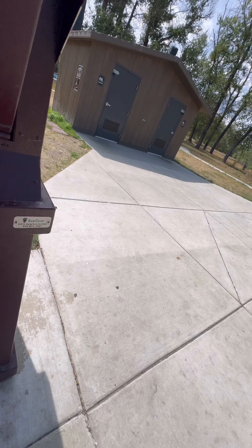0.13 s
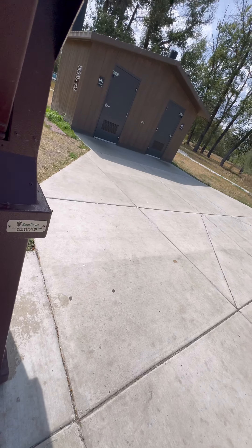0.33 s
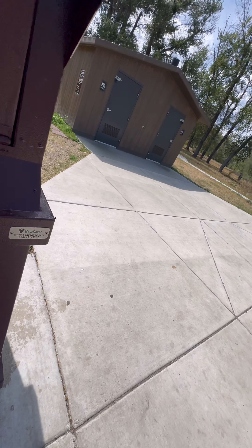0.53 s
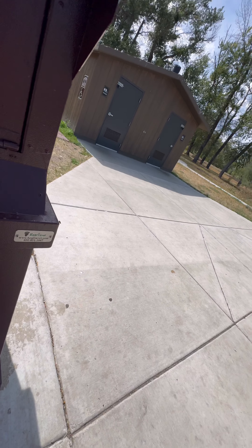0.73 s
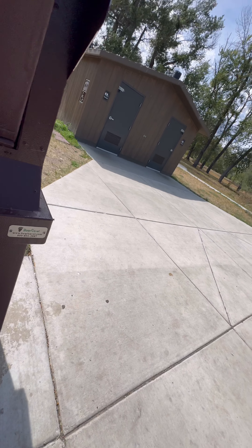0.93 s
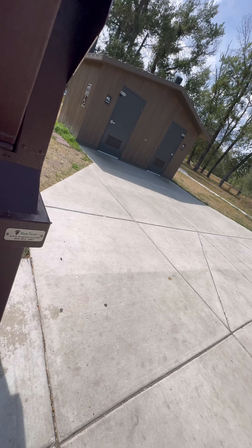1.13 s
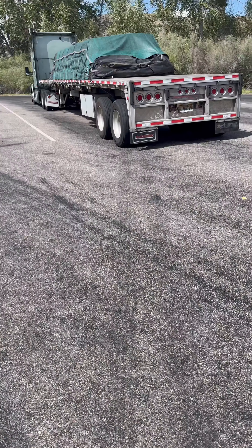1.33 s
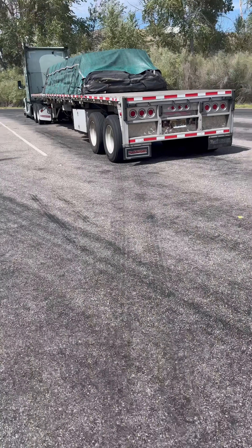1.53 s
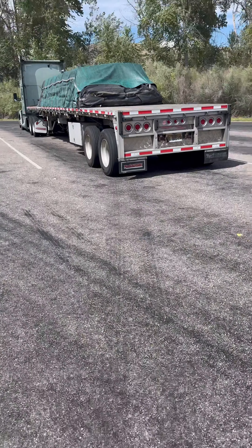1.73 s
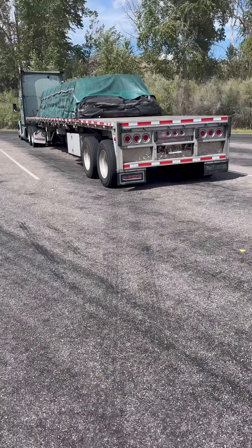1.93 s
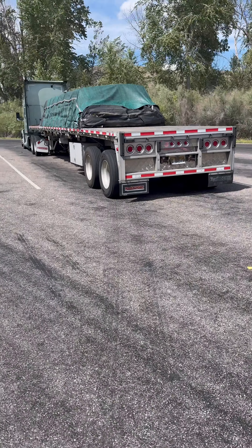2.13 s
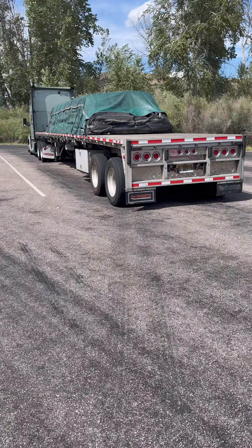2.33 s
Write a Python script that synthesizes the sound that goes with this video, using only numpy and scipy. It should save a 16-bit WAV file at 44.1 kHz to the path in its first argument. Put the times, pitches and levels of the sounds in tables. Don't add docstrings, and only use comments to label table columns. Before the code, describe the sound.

A steel bin lid slams shut with a loud, hollow bang, then a diesel truck idles close by

```python
import sys
import numpy as np
from scipy import signal
from scipy.fft import rfft, irfft, next_fast_len
from scipy.io import wavfile
from scipy.ndimage import uniform_filter1d, map_coordinates

SR = 44100
rng = np.random.default_rng(int(sys.argv[2]) if len(sys.argv) > 2 else 0)


def file_out(sig):
    cols = np.atleast_2d(sig).T
    lim = np.clip(cols, -1, 1)
    pcm = np.round(lim * 32767).astype(np.int16)
    wavfile.write(sys.argv[1], SR, pcm)


def ratio(d):
    e = np.asarray(d, float) / 20
    return 10 ** e


N = 105663
T = np.arange(N) / SR


def unit(x):
    return x / np.sqrt(np.mean(x ** 2) + 1e-20)


def along(points, hz):
    f, v = np.transpose(points)
    return np.interp(np.log(hz + 1), np.log(f + 1), v)


def wobble(rate):
    return map_coordinates(rng.standard_normal(300), [np.clip(T * rate, 0, 290)])


def filtered(x, response):
    m = next_fast_len(N + SR // 2)
    return irfft(rfft(x, m) * response(np.fft.rfftfreq(m, 1 / SR)), m)[..., :N]


def ports(pair, lead, pan):
    side = np.array([[.5], [-.5]])
    return filtered(pair, lambda hz: ratio(side * along(pan, hz)) * np.exp(1j * side * along(lead, hz)))


def rush(spectrum, alike, source=None):
    pair = rng.standard_normal((2, N))
    if source is not None:
        pair = pair * source

    def response(hz):
        turn = np.arccos(np.clip(along(alike, hz), 0, 1)) / 2
        return ratio(along(spectrum, hz)) * [np.cos(turn), np.sin(turn)]

    mid, side = filtered(pair, response)
    return unit(np.array([mid + side, mid - side]))


def ring(s, db, hz, t60, attack=0.0035, turn=0):
    out = np.zeros(N)
    span = slice(int(s * SR) + 1, int((s + 1.5 * t60) * SR))
    t = T[span] - s
    tone = np.sin(2 * np.pi * (hz * t + np.broadcast_to(turn, N)[span]))
    out[span] = ratio(db - 60 * t / t60) * tone * (1 - np.exp(-t / attack))
    return out


def dying(t60, seconds, channels):
    hz, t, z = signal.stft(rng.standard_normal((channels, int(seconds * SR))), SR, nperseg=128)
    return signal.istft(z * ratio(-60 * t / along(t60, hz)[:, None]), SR, nperseg=128)[1]


def shaft():
    idle_hz, wander = 19.42, 0.00447
    return np.cumsum(idle_hz * (1 + wander * wobble(2.88))) / SR


# (shaft order, level [dB])
EXHAUST = [(2, -58.5), (3, -37.5), (4, -41.5), (5, -28.5), (6, -49.5), (7, -30), (8, -31.5), (9.5, -41),
           (11, -51), (12, -42), (14, -47.5), (16, -51), (21.5, -47), (24.5, -53.5)]
# (time [s], level [dB])
SURGE = [
    (1.2, -0.5),
    (1.33, -11),
    (1.39, 5.5),
    (1.52, -1),
    (1.62, -1),
    (1.95, -6.5),
    (2.12, 2),
    (2.25, -3),
    (2.4, 3),
]


def exhaust(turns):
    lope_db, lope_rate = 2.5, 7.215
    load_db = np.interp(T, *np.transpose(SURGE))
    tones = np.zeros(N)
    for order, db in EXHAUST:
        share = np.where(order <= 5, 1, (order <= 8) * 0.26)
        level = ratio(db + share * load_db + lope_db * wobble(lope_rate))
        tones += level * np.sin(2 * np.pi * (order * turns + rng.random()))
    return tones * 2 ** .5


# (frequency [Hz], level [dB per Hz])
FAR_AIR = [(30, -11.5), (100, -4.5), (244, -15), (330, -23.5), (1030, -22.5), (1400, -32), (4700, -40),
           (9000, -58), (15800, -72.5)]
# (frequency [Hz], coherence [0 to 1])
FAR_ALIKE = [(60, 0.81), (240, 0.87), (950, 0.28), (3770, 0.15), (15000, .05)]
# (frequency [Hz], phase [rad])
FAR_LEAD = [(300, 0.13), (1300, 0.14), (4000, 1.1)]
# (frequency [Hz], level [dB])
FAR_PAN = [(60, -3.8), (380, -2.5), (2380, -0.3), (15000, 0)]


def far_truck(tones):
    air = ratio(-36 + 0.4 * wobble(11.5)) * rush(FAR_AIR, FAR_ALIKE)
    return ports(ratio(-14.5) * tones + air, FAR_LEAD, FAR_PAN)


# (time [s], level [dB], rise [s], t60 [s])
SCUFFS = [(0.02, -42.5, 0.063, 0.6), (0.095, -42.5, 0.014, 0.45), (0.1429, -34, 0.00089, 0.055),
          (0.31, -46, 0.0092, 0.044), (0.409, -43, 0.037, 1.17), (0.5282, -37, .0007, 0.086),
          (0.612, -32.5, 0.034, 0.39), (0.82, -41.5, .001, 0.13), (0.902, -40.5, 0.072, 0.86),
          (0.965, -33.5, 0.0094, 0.29), (1.028, -40.5, 0.08, 0.091), (1.117, -43, .004, 0.076),
          (1.178, -40.5, 0.036, 0.95)]
# (frequency [Hz], level [dB per Hz])
GRIT = [(590, -0.5), (1000, -8), (1500, -15), (3250, -10.5), (6000, -13.5), (9000, -16.5), (12000, -28),
        (15800, -21)]


def scuffs():
    grains_per_s, grain_db = 800, -9
    swell = np.zeros(N)
    for s, db, rise, t60 in SCUFFS:
        decay = ratio(db - 60 * np.clip(T - s, 0, None) / t60)
        swell += decay * np.exp(np.clip(T - s, None, 0) / rise)
    grains = (rng.random(N) < grains_per_s / SR) * rng.exponential(1, N) * 20
    rough = 1 + ratio(grain_db) * uniform_filter1d(grains, size=20)
    return swell * rush(GRIT, [(1000, 0.92)], rough)


# (time [s], level [dB], frequency [Hz])
TICKS = [(0.0923, -30.5, 6150), (.1416, -34, 7750), (.3012, -42, 4870), (.5287, -34.5, 1950),
         (.529, -29.5, 5200), (0.532, -30.5, 2940), (0.536, -28.5, 8100), (0.594, -44, 2680),
         (.745, -30, 5700), (.8175, -30, 5400), (.836, -35, 4700), (.947, -38, 11200), (.9617, -28, 3370),
         (1.116, -31.5, 5500), (1.177, -33, 3200)]


def ticks():
    spread = rng.normal(1, 0.074, (len(TICKS), 4))
    out = np.zeros(N)
    for (s, db, hz), ratios in zip(TICKS, spread):
        out += sum(ring(s, db - 9, hz * k, t60=.035, attack=0.00084) for k in ratios)
    return out


# (time [s], peak [dB], frequency [Hz], t60 [s])
HEELS = [
    (.144, -16, 255, 0.04),
    (.145, -26, 332, 0.042),
    (.19, -27.5, 198, 0.063),
    (0.533, -30, 152, 0.029),
]


def heels():
    out = np.zeros(N)
    for s, db, hz, t60 in HEELS:
        out += ring(s, db, hz, t60) + 0.41 * ring(s, db, hz * 1.745, t60 * 0.97)
    return out


# (time [s], peak [dB], brightness [dB])
CONTACTS = [
    (0.6214, -12, 6.5),
    (0.634, -13, 4.5),
    (.65, -16.5, 7.5),
    (0.6576, -19.5, -7.5),
    (.672, -23, -6.5),
    (0.695, -24.5, -3),
    (0.714, -31.5, -5),
]
# (frequency [Hz], level [dB per Hz])
CRASH = [(40, -30.5), (100, -7.5), (300, -6.5), (700, -6), (1470, -15), (6500, -15), (10000, -19),
         (15800, -34.5)]
# (frequency [Hz], t60 [s])
DYING = [(60, 1.0), (200, .55), (400, 1.0), (700, 0.58), (1200, 0.64), (3000, 0.23), (8000, 0.15),
         (15000, 0.077)]


def rim_crash():
    out = np.zeros(N + SR)
    for s, db, bright_db in CONTACTS:
        crash = dying(DYING, .8, channels=1)[0] * ratio(-3.5)
        crash[:300] += 1.17 * ratio(bright_db - 60 * T[:300] / 0.022) * rng.standard_normal(300)
        crash[:300] *= 1 - np.exp(-T[:300] / 0.00064)
        out[round(s * SR):][:len(crash)] += ratio(db - CONTACTS[0][1]) * crash
    hz = np.fft.rfftfreq(4096, 1 / SR)
    cepstrum = irfft(np.log(ratio(along(CRASH, hz)) + 1e-6))
    cepstrum[1:2048] *= 2
    cepstrum[2049:] = 0
    colour = irfft(np.exp(rfft(cepstrum)))
    return ratio(-15) * signal.fftconvolve(out[:N], colour / np.linalg.norm(colour))[:N]


def loose(s, db, hz, t60, attack, sag=0):
    flutter_db, flutter_rate, bend = 1.8, 35, .012
    detune = bend * wobble(flutter_rate) - sag * (T - s)
    drift = np.cumsum(hz * detune * (T > s)) / SR
    return ratio(flutter_db * wobble(flutter_rate)) * ring(s, db, hz, t60, attack, drift)


# (frequency [Hz], level [dB], t60 [s])
SHEET = [(1019, -7, 0.3), (1144, -6, 0.28), (1300, -12, 0.2), (1906, -14, 0.25), (2455, -12, 0.2),
         (2654, -9, 0.14), (2760, -23.5, 0.3), (2998, -7, 0.16), (3650, -21, 0.3), (3930, -13, 0.16)]


def sheet():
    out = np.zeros(N)
    for s, db, _ in CONTACTS[:4]:
        for hz, level, t60 in SHEET:
            out += loose(s, db + level + rng.normal(0, 2.3) - 9, hz, t60, 0.0033)
    return out


# (frequency [Hz], level [dB], t60 [s])
BIN = [(131.6, -16.5, 0.2), (300, -25.5, 0.47), (351, -14, 0.32), (386, -20, 0.27), (535, -39, 0.34),
       (650.5, -25, 0.3), (824, -26, 0.26)]


def bin_body():
    return sum(loose(CONTACTS[0][0], level, hz, t60, 1.4 / hz) for hz, level, t60 in BIN)


# (time [s], level [dB], frequency [Hz], t60 [s])
PUNCH = [(.6225, -3, 660, .045), (.6325, -11, 400, .035), (.638, -15, 730, .09), (.638, -15, 850, .07),
         (.651, -11, 250, .06), (.6545, -8, 510, .05), (.693, -14, 390, .04), (.878, -24, 500, .05),
         (.917, -20, 510, .06), (1.02, -28, 470, .05), (1.1, -31, 480, .04), (1.18, -25, 330, .03)]


def punches():
    return sum(ring(*blow, attack=.0025) for blow in PUNCH)


def slam():
    start_hz, end_hz, sag_s = 760, 100, .005
    t = np.clip(T - .6235, 0, None)
    turns = end_hz * t + (start_hz - end_hz) * sag_s * (1 - np.exp(-t / sag_s))
    return ratio(-6 - 60 * t / .1) * (1 - np.exp(-t / .004)) * np.sin(2 * np.pi * turns)


# (time [s], level [dB], frequency [Hz], t60 [s], attack [s])
BOOM = [
    (.628, -11, 60, .5, .02),
    (.635, -17, 72, .3, .02),
    (.655, -15, 128, .3, .008),
    (.79, -25, 66, .22, .02),
    (.905, -28, 78, .25, .02),
]


def air_boom():
    return sum(ring(*boom) for boom in BOOM)


# (time [s], peak [dB], frequency [Hz], t60 [s])
ROCKS = [(.703, -20, 298.7, 0.32), (0.766, -20.5, 278, 0.19), (0.753, -22, 346.5, .15),
         (0.806, -23, 116, 0.28), (0.807, -31.5, 241, 0.15), (.845, -29, 331, 0.14),
         (.878, -24, 293.8, 0.27), (0.916, -23, 209.4, 0.15), (.97, -21, 216.9, 0.43),
         (1.025, -26.5, 208.7, 0.27), (1.047, -28.5, 358, 0.076), (1.087, -24.5, 192, 0.2)]


def rocking():
    twin, twin_db = 1.3, -9
    out = np.zeros(N)
    for s, db, hz, t60 in ROCKS:
        out += loose(s, db, hz, t60, 0.003, sag=.35)
        out += loose(s, db + twin_db, hz * twin, t60, 0.018)
    return out


# (frequency [Hz], t60 [s])
YARD = [(100, 0.15), (1000, 0.38), (8000, 0.1)]


def yard(bang):
    wide_hz = 700
    tail = dying(YARD, .6, channels=2)
    delayed = np.pad(bang, (300, 0))[None]
    mid, side = signal.fftconvolve(delayed, tail / np.linalg.norm(tail[0]), axes=1)[:, :N]
    side = filtered(side, lambda hz: hz ** 2 / (hz ** 2 + wide_hz ** 2))
    return ratio(-13) * np.array([mid + side, mid - side])


# (frequency [Hz], width [Hz], level [dB])
TAPS = [(2350, 110, -1), (2780, 180, 2), (3020, 110, -7), (3700, 190, -6), (4340, 210, -6.5),
        (5800, 380, -14), (7100, 250, -8.5)]
CLATTER_TURN = 0.24


def taps(turns):
    bunch = (1 + np.cos(2 * np.pi * (turns - CLATTER_TURN))) ** 2
    taps_per_s, shape = 70, (len(TAPS), N)
    hits = (rng.random(shape) < taps_per_s / SR * bunch) * rng.standard_normal(shape)
    out = np.zeros(N)
    for row, (centre, width, db) in zip(hits, TAPS):
        cover = lambda f: 1j * f * width / (centre * centre - f * f + 1j * f * width)
        out += ratio(-15.5 + db) * filtered(row, cover)
    return out


# (frequency [Hz], level [dB per Hz])
CLATTER = [(470, -42), (800, -5), (1850, -16), (2500, -13), (4400, -20), (9200, -34.5), (12000, -77),
           (15800, -39.5)]
# (frequency [Hz], coherence)
NEAR_ALIKE = [(60, 0.93), (180, 1), (550, -0.014), (1650, 0.69), (4970, 0.44), (15000, -0.045)]


def clatter(turns):
    beat = 1 + 0.11 * np.cos(2 * np.pi * (turns - CLATTER_TURN)) + 0.048 * np.cos(4 * np.pi * turns)
    return ratio(-41.5 + 0.24 * wobble(7.1)) * beat * rush(CLATTER, NEAR_ALIKE)


# (frequency [Hz], level [dB per Hz])
NEAR_ROAR = [(18, -46), (30, -29), (74, -5.5), (140, -12.5), (338, -20.5), (425, -19), (509, -23),
             (846, -25), (1500, -36), (1950, -45.5), (3300, -120)]


def roar():
    return ratio(-31.5 + 0.79 * wobble(11.97)) * rush(NEAR_ROAR, NEAR_ALIKE)


# (frequency [Hz], phase [rad])
TRUCK_LEAD = [(350, 0), (780, 1), (1800, 0.19), (2670, -1.54), (3700, 0.95), (6000, -0.21), (9300, 0.92),
              (15000, -3)]
# (frequency [Hz], level [dB])
NEAR_PAN = [(60, 1.4), (240, -4), (950, 0.2), (3770, 1), (15000, -1)]


def near_truck(tones, turns):
    return ports(tones + clatter(turns) + taps(turns) + roar(), TRUCK_LEAD, NEAR_PAN)


# (frequency [Hz], phase [rad])
BIN_LEAD = [(150, 0), (330, .2), (650, 1.13), (1800, .6), (3900, 1.04), (5200, 2), (6500, 1.08),
            (8500, 1.5), (15000, 2.6)]
# (frequency [Hz], level [dB])
LID_PAN = [(60, -1.9), (240, -2.3), (950, 1.0), (3770, 0.83), (15000, 0.38)]
CUT_S, CUT_FADE_S = 1.208, 0.0049


def scene():
    near = np.clip((T - CUT_S) / CUT_FADE_S, 0, 1)
    turns = shaft()
    tones = exhaust(turns)
    steps = ports(scuffs() + ticks() + heels(), BIN_LEAD, FAR_PAN)
    bang = rim_crash() + sheet() + bin_body() + rocking()
    blows = punches() + slam() + air_boom()
    lid = ports(bang + blows + yard(bang), BIN_LEAD, LID_PAN)
    return (1 - near) * (far_truck(tones) + steps + lid) + near * near_truck(tones, turns)


def roll_off(x):
    return signal.sosfilt(signal.butter(12, 16470, fs=SR, output="sos"), x)


# (frequency [Hz], level [dB])
SIDE_COLOUR = [(100, -3.5), (1200, 0.5), (2000, -4.5), (2900, -0.5), (3900, -2.5), (5200, 1.5), (6500, 0.5),
               (8000, 4.5), (11000, 2.5), (15000, 2.5)]
# (frequency [Hz], level [dB])
AIR_TILT = [(13800, -4), (15700, 3)]
LEAKS = [
    .152,
    .31,
    .624,
    .822,
    1.21,
]
LEAK_S = [.012, .011, .004, .008, .006]
# (low, high) [Hz]
GAP_HZ = (10000, 13800)


def record(dry):
    low_hz, top_hz = 35, 15900
    pair = np.array([dry[0] + dry[1], dry[0] - dry[1]]) / 2
    mid, side = filtered(pair, lambda hz: (hz < top_hz) * (1j * hz / low_hz / (1 + 1j * hz / low_hz)) ** 2)
    side = filtered(side, lambda hz: ratio(along(SIDE_COLOUR, hz)))
    air = filtered(mid, lambda hz: (hz > GAP_HZ[1]) * ratio(along(AIR_TILT, hz)))
    air = air * ratio(np.where(T < CUT_S, 7, -1))
    leak = sum(np.exp(-((T - s) / half) ** 4) for s, half in zip(LEAKS, LEAK_S))
    gap = filtered(mid, lambda hz: (hz > GAP_HZ[0]) & (hz <= GAP_HZ[1])) * (ratio(-55) + leak)
    mid = filtered(mid, lambda hz: hz <= GAP_HZ[0]) + gap + air
    return roll_off(np.array([mid + side, mid - side]))


dry = scene()
out = record(dry)
file_out(out)
```